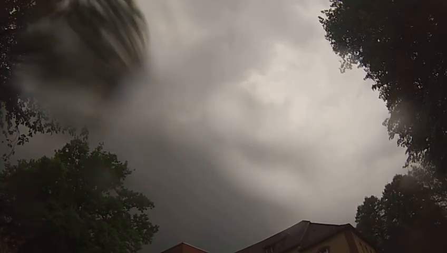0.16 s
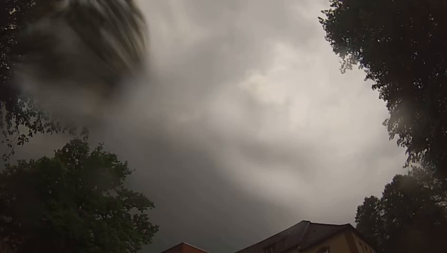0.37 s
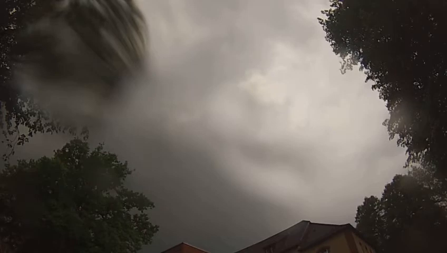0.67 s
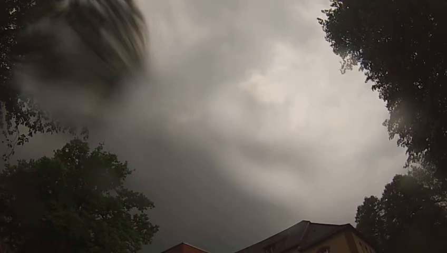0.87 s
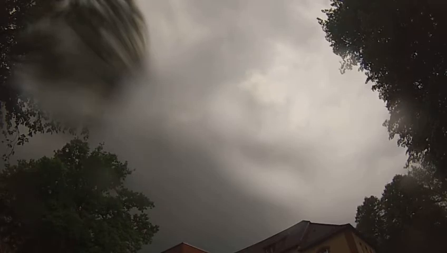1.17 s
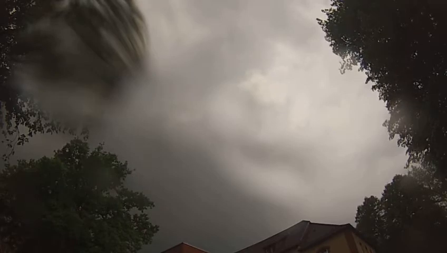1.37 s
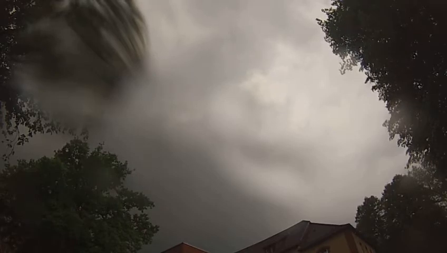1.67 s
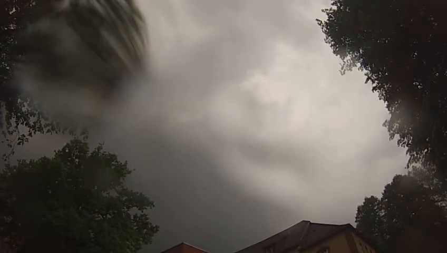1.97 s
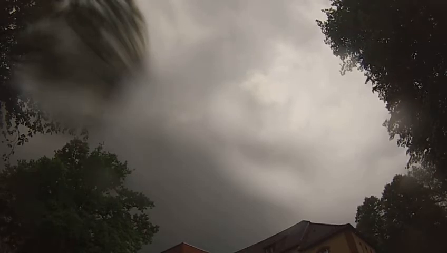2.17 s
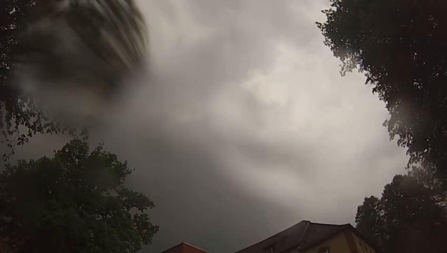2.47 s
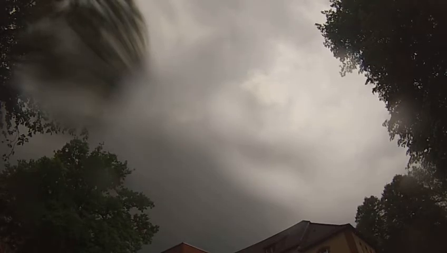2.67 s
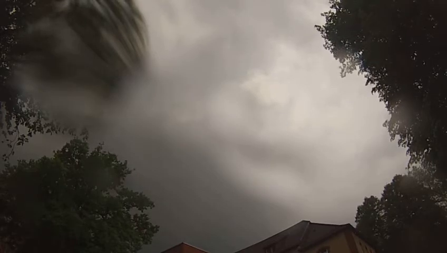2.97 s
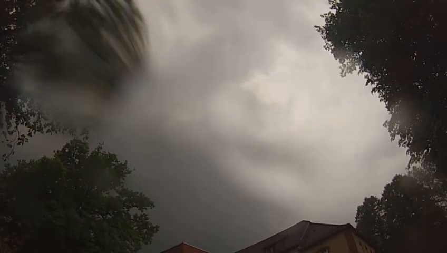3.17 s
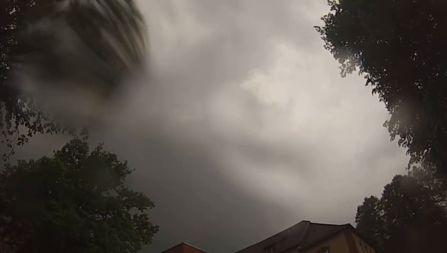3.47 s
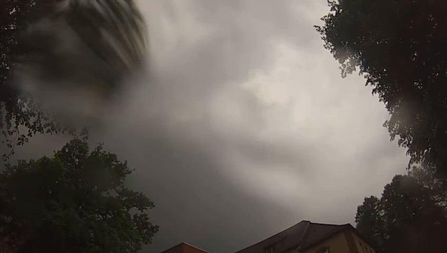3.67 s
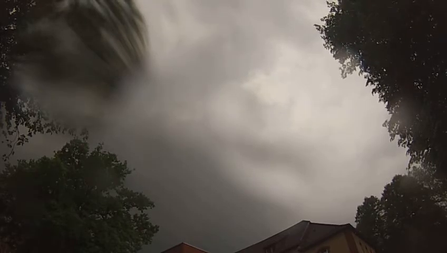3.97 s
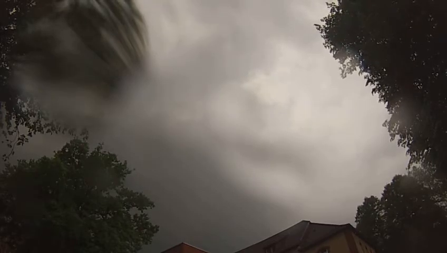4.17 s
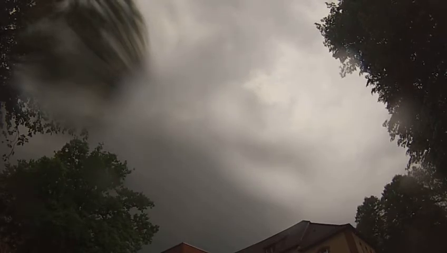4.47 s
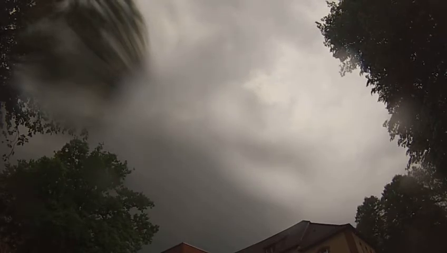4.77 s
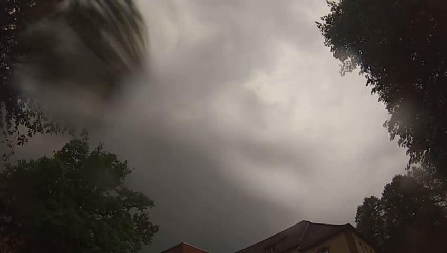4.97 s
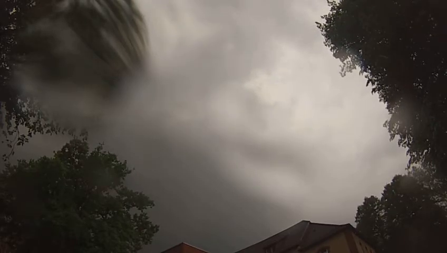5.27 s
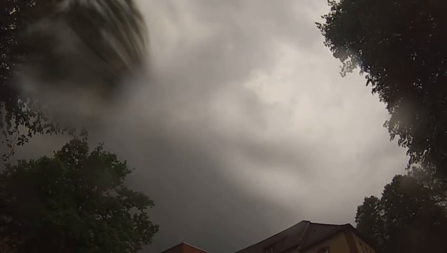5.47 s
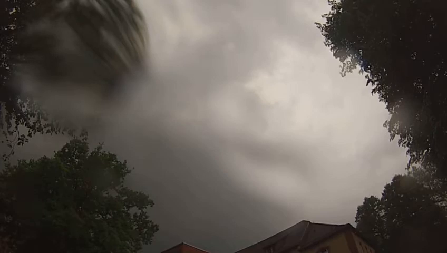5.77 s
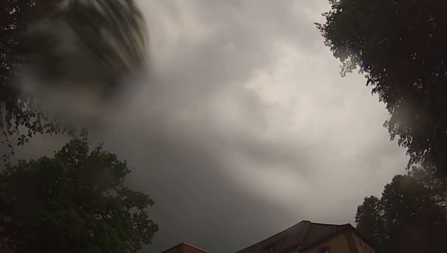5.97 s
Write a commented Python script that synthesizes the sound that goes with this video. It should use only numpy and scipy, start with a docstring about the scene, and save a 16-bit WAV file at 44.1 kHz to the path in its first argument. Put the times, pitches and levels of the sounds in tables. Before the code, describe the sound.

First drops of a storm land irregularly on hollow plastic, dry clicks and a few loud tocks, against very soft wind and a faint drone.

```python
"""From the start, filtered noise makes a quiet outdoor hush, over a faint low hum built from two wavering tones.
From 0.6 s the first drops of a storm fall on a small camera that looks up at the sky from a garden.
Each drop sends a blow and a burst of spray through the ringing plastic housing; tiny droplets tick at random.
A drop near 1 s and one near 5.6 s also ring a pocket of air in the water, as short dying tones.
Soft low bumps of the mount come between 1.1 and 5.6 s; the hum sinks away after about 3.6 s."""
import sys
import numpy as np
from scipy import signal
from scipy.fft import rfft, irfft
from scipy.io import wavfile

SR = 44100
rng = np.random.default_rng(int(sys.argv[2]) if len(sys.argv) > 2 else 0)


def generate_wav(sig):
    """Save sig (samples, or channels by samples) to the path in sys.argv[1] as 16-bit PCM at SR."""
    pcm = np.round(np.clip(np.atleast_2d(sig).T, -1, 1) * 32767).astype(np.int16)
    wavfile.write(sys.argv[1], SR, pcm)


N = 269451  # length in samples, about 6.1 s


def gain_of(db):
    """Turns decibels into an amplitude factor."""
    return 10 ** (np.asarray(db) / 20)


def evened(x):
    """Scales a sound to an average (rms) strength of 1."""
    return x / np.sqrt(np.mean(x ** 2) + 1e-20)


def read_curve(points, hz):
    """Reads the dB of a (Hz, dB) curve, with straight lines between points on a log-frequency axis."""
    point_hz, point_db = np.transpose(points)
    return np.interp(np.log(hz + 1), np.log(point_hz + 1), point_db)


def add(mix, start_s, sound):
    """Mixes a sound in at its start time, cutting off what runs past the end."""
    start = max(round(start_s * SR), 0)
    part = mix[start:][:len(sound)]
    part += sound[:len(part)]


def wander(rate_hz):
    """Smooth random movement of rms 1: noise that keeps only what changes slower than about rate_hz."""
    hz = np.fft.rfftfreq(N, 1 / SR)
    slow = rfft(rng.standard_normal(N)) * np.exp(-(hz / rate_hz) ** 2)
    return evened(irfft(slow, N))


def die_away(t, t60):
    """Exponential fade that falls by 60 dB in t60 seconds."""
    return np.exp(-np.log(1000) * t / t60)


def ring(hz, db, t60, size):
    """One vibration: a sine that dies away by friction and radiation."""
    t = np.arange(size) / SR
    return gain_of(db) * die_away(t, t60) * np.sin(2 * np.pi * hz * t)


def swelling_rings(rows, rise_s):
    """Single rings that swell briefly and then die."""
    out = np.zeros(N)
    t = np.arange(SR // 2) / SR
    swell = 1 - np.exp(-t / rise_s)
    for start_s, hz, db, t60 in rows:
        add(out, start_s, ring(hz, db, t60, size=len(t)) * swell)
    return out


def coloured(x, points):
    """Minimum-phase filter along a (Hz, dB) curve: causal, so nothing sounds before the blow."""
    hz = abs(np.fft.fftfreq(len(x), 1 / SR))
    log_gain = np.log(gain_of(read_curve(points, hz)))
    # the Hilbert transform of the log gain supplies the matching phase
    response = np.exp(np.conj(signal.hilbert(log_gain)))
    return irfft(rfft(x) * response[:len(x) // 2 + 1])


def bell(x, hz, db, sharpness):
    """Causal resonant filter: a peak (db above 0) or a dip (db below 0) around hz."""
    s = 1j * np.fft.rfftfreq(len(x), 1 / SR) / hz
    top = s * s + s * gain_of(db) / sharpness + 1
    bottom = s * s + s / sharpness + 1
    return irfft(rfft(x) * top / bottom)


# Tone colour of the outdoor hush, before its two halves get their levels.
# Each row: frequency in Hz, relative level in dB.
HUSH_COLOUR = [(12, -32), (20, -9.5), (59, -4), (80, -5), (115, -5.5), (174, -7.5), (294, -11.5),
               (328, -11), (357, -12), (1240, -18.5), (1390, -19), (2280, -21), (2620, -22.5),
               (5380, -27.5), (15000, -38.5)]
RUMBLE_DB, AIR_DB = -65, -66  # levels below and above the split, before easing and flutter


def hush(rumble_flutter_db=1.8, air_flutter_db=0.84, easing_db_per_s=0.15, split_hz=450):
    """Far wind and leaves: coloured noise whose rumble and hiss flutter apart, the rumble slowly easing."""
    hz, t = np.fft.rfftfreq(N, 1 / SR), np.arange(N) / SR
    noise = rfft(rng.standard_normal(N)) * gain_of(read_curve(HUSH_COLOUR, hz))
    low = 1 / (1 + (hz / split_hz) ** 8)
    rumble_db = RUMBLE_DB - easing_db_per_s * t + rumble_flutter_db * wander(9.5)
    air_db = AIR_DB + air_flutter_db * wander(29)
    rumble = evened(irfft(noise * low, N)) * gain_of(rumble_db)
    air = evened(irfft(noise * (1 - low), N)) * gain_of(air_db)
    return rumble + air


# How loud the far hum is over time, before its small waver.
# Each row: time in seconds, level in dB.
HUM_LEVEL = [(0.0, -75), (0.32, -67.5), (1.22, -74), (1.62, -69), (2.86, -76), (2.96, -68.5), (3.62, -70.5),
             (3.66, -79), (5.99, -78.5), (6.11, -77)]
HUM_HZ = 113.7


def hum(octave_db=-13, waver_db=1.0, waver_hz=0.55):
    """A far motor drones: a tone and its weak octave, wavering a little in pitch and level."""
    angle = 2 * np.pi * np.cumsum(HUM_HZ + waver_hz * wander(4.1)) / SR
    tone = np.sin(angle) + gain_of(octave_db) * np.sin(2 * angle)
    level_db = np.interp(np.arange(N) / SR, *np.transpose(HUM_LEVEL))
    return evened(tone) * gain_of(level_db + waver_db * wander(4.8))


# Soft bumps of the mount.
# Each row: start in seconds, pitch in Hz, level in dB before the swell, time to die by 60 dB in seconds.
MOUNT_BUMPS = [(1.092, 60, -53.5, 0.15), (2.0385, 154, -35, 0.026), (3.239, 57.5, -47.5, 0.29),
               (5.270, 69, -48.5, .1), (5.615, 64.5, -45.5, 0.22)]


def bumps():
    """The shaken mount gives single low rings that swell and die."""
    return swelling_rings(MOUNT_BUMPS, rise_s=0.0021)


# The ways the plastic housing vibrates.
# Each row: pitch in Hz, relative level in dB, time to die by 60 dB in seconds.
HOUSING_MODES = [(293, -38.5, 0.052), (488, -22.5, 0.03), (755.6, -4, 0.029), (1114, -1.48, 0.021),
                 (1548, 0.05, 0.013), (2134, 2.4, 0.011), (2405, 7.5, 0.0034), (3565, 3.5, 0.0031),
                 (4480, -7, 0.0051), (4990, -7.5, 0.0084), (5600, -8, 0.0086), (6400, -7, 0.0058),
                 (7800, -3, 0.0047), (9370, -4.5, 0.0034), (11900, -4, 0.0018)]


def housing():
    """The shell's answer to one blow; neighbouring modes move in opposite directions at the microphone."""
    shell = 0
    for k, (hz, db, t60) in enumerate(HOUSING_MODES):
        shell = shell + (-1) ** k * ring(hz, db, t60, size=4096)
    return shell


def splash(size, level_db=-19, t60=0.026, edge_hz=3600):
    """The drop bursts into spray: a short patter of bright noise that swells in about half a millisecond."""
    t = np.arange(size) / SR
    burst = rng.standard_normal(size) * die_away(t, t60) * (1 - np.exp(-t / 0.00054))
    return gain_of(level_db) * coloured(burst, [(edge_hz / 2, -25), (edge_hz, 0), (8000, 0), (14000, -7)])


# Ways a drop can land on the housing, named for how they sound.
# Each entry: low thump, tick and hard crack, all in dB relative to the knock before the brightness tilt,
# then the dipped (node) frequency and the favoured frequency in Hz.
LANDING_KINDS = {"thud": (12.5, -3, -21, 2485, 1179), "knock": (13, -4.5, -21.5, 504, 820),
                 "tock": (2.2, 0, -20.5, 604, 612), "tap": (3.5, 4.5, -4, 5212, 1723),
                 "tick": (10, 10.2, 2.2, 5150, 1220), "ping": (6, 7, -9.5, 5562, 2394),
                 "slap": (23.5, 3, -5.5, 455, 1822), "snap": (22.5, 8, -4, 1688, 1830),
                 "click": (19, 6.3, 7.1, 5200, 597), "clack": (4, 11, 13, 758, 1805),
                 "crack": (9.6, 6.4, 12.8, 1420, 1800), "zing": (20, 9.4, 10.6, 3500, 2010)}
SPRAY_DB = -15  # the highest band at 9000 Hz, relative to the crack


def drop(shell, landing, knock_db, brightness_db):
    """A soft landing stirs mostly low modes, a hard one the high ones too; brightness tilts the blow."""
    thump_db, tick_db, crack_db, node_hz, favoured_hz = LANDING_KINDS[landing]
    blow = [(60, thump_db - 31.0), (220, thump_db), (450, thump_db), (700, 0), (1200, 0),
            (2020, tick_db), (2530, tick_db), (3240, crack_db), (5500, crack_db), (9000, crack_db + SPRAY_DB)]
    hz, db = np.transpose(blow)
    octaves = np.log2(np.maximum(hz, 250) / 1000)  # the tilt turns around 1000 Hz and stops below 250 Hz
    tilted_blow = np.c_[hz, db + brightness_db * octaves]
    knock = coloured(shell + splash(size=len(shell)), tilted_blow)
    # the landing spot lies on a node (still point) of one vibration and on a crest of another
    knock = bell(knock, node_hz, db=-38, sharpness=2.5)
    knock = bell(knock, favoured_hz, db=7.0, sharpness=6.9)
    return gain_of(knock_db) * knock


def droplets(shell, knock_db=-71, spread_db=6, brightness_db=-2, count=20):
    """Tiny droplets land very softly on the shell, at random moments and in any way."""
    out = np.zeros(N)
    landings = list(LANDING_KINDS)
    for when, weight, spot in rng.random((count, 3)):
        landing = landings[int(spot * len(landings))]
        tick = drop(shell, landing, knock_db + spread_db * weight, brightness_db)
        add(out, when * N / SR, tick)
    return out


# Air pockets that ring in the water under a drop.
# Each row: start in seconds, pitch in Hz, level in dB before the swell, time to die by 60 dB in seconds.
AIR_POCKETS = [(1.0158, 684, -18, 0.031), (1.0295, 663, -34.5, 0.039), (5.6172, 618, -26.5, 0.054)]


def plops():
    """A pocket of air trapped in the water rings at its own pitch, swelling and then dying."""
    return swelling_rings(AIR_POCKETS, rise_s=0.002)


# The drops that hit the housing squarely.
# Each row: start in seconds, kind of landing, knock setting in dB, brightness in dB per octave.
SQUARE_DROPS = [(0.6207, "clack", -45, -3.1), (0.64, "knock", -42, -1.3), (0.7307, "tock", -35, 1.8),
                (0.9143, "tick", -49, 0.4), (1.015, "knock", -32.5, 5.5), (1.0902, "knock", -20.5, 0.95),
                (1.2777, "snap", -56, -2.5), (2.0773, "click", -42, -1), (2.136, "snap", -41.5, 4),
                (2.2293, "tock", -40.5, 1.9), (2.4611, "tick", -46, -2), (2.478, "snap", -43.5, 0.3),
                (2.4842, "knock", -39.5, -3.2), (2.7234, "thud", -41, -2), (2.729, "clack", -39.5, -3.2),
                (2.834, "knock", -42, 0.5), (2.8919, "tap", -42.5, -4), (2.958, "zing", -41, 2),
                (3.4725, "knock", -43.5, -2.2), (3.48, "tap", -45.5, 1), (3.5305, "tick", -52, 2),
                (3.7092, "thud", -52.5, 0), (3.722, "snap", -38.5, 0.2), (3.7774, "ping", -56, -0.3),
                (3.8239, "tock", -47, 3.5), (4.0206, "snap", -45.5, 2), (4.235, "thud", -48.5, -10),
                (4.3271, "ping", -38.5, -2.5), (4.8669, "tap", -49.5, -2.7), (5.179, "tap", -44, 2),
                (5.1898, "thud", -49, 3.2), (5.266, "tick", -40, -0.6), (5.4039, "tock", -35.5, -1.1),
                (5.615, "slap", -36.5, 5.6), (5.6172, "crack", -29.5, -0.2), (5.6647, "tock", -22.5, -3),
                (5.7045, "ping", -45, 4.5), (5.7757, "click", -51, 2), (5.947, "slap", -49, 7),
                (6.0284, "tap", -43.5, 1.5), (6.0378, "tock", -33.5, -2.5)]


def rain(shell):
    """Each square hit excites the shell with its own kind of blow."""
    out = np.zeros(N)
    for start_s, landing, knock_db, brightness_db in SQUARE_DROPS:
        add(out, start_s, drop(shell, landing, knock_db, brightness_db))
    return out


def scene():
    """Drops on the housing over the garden's background."""
    background = hush() + hum() + bumps()
    shell = housing()
    water = droplets(shell) + plops() + rain(shell)
    return (background + water)[None]  # one channel


WHINE_HZ, WHINE_DB = 14566, -103.5
EDGE_HZ = 15300  # treble above this is removed


def record(dry):
    """The camera adds its extremely faint, steady whine; then a low-pass filter limits the treble."""
    whine = gain_of(WHINE_DB) * evened(np.sin(2 * np.pi * WHINE_HZ * np.arange(N) / SR))
    low_pass = signal.firwin(255, EDGE_HZ, window=("kaiser", 8), fs=SR)
    return signal.oaconvolve(dry + whine, low_pass[None], "same")


dry = scene()
out = record(dry)
generate_wav(out)
```